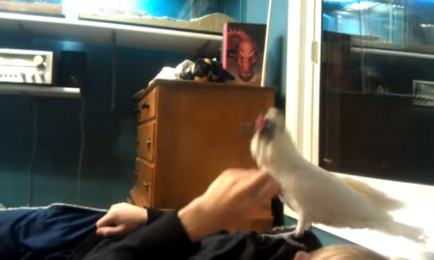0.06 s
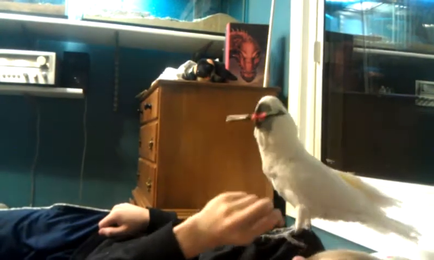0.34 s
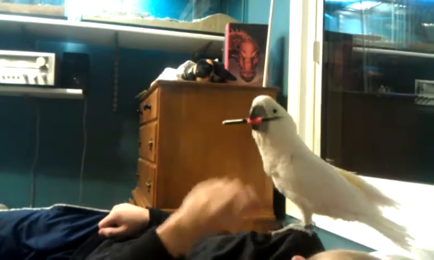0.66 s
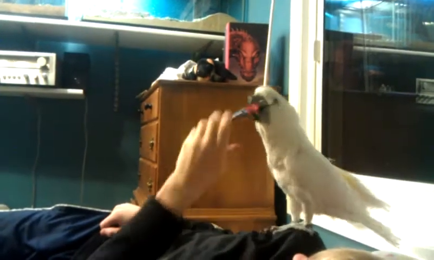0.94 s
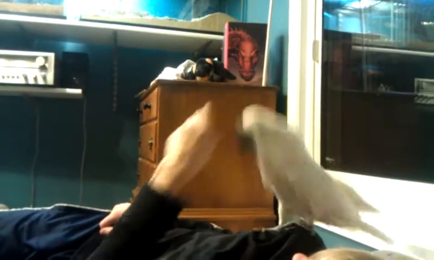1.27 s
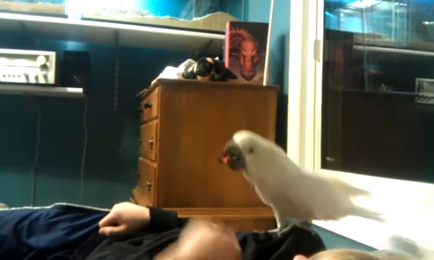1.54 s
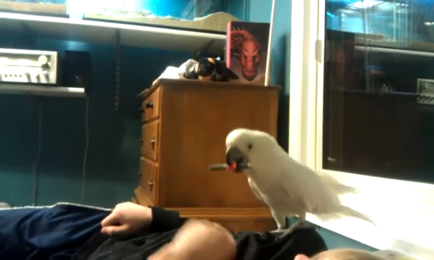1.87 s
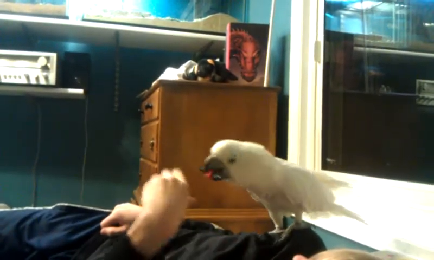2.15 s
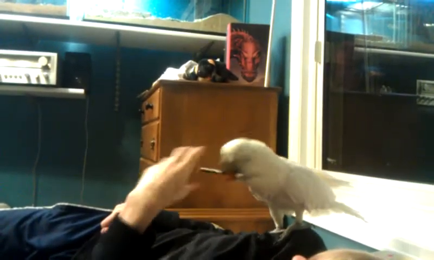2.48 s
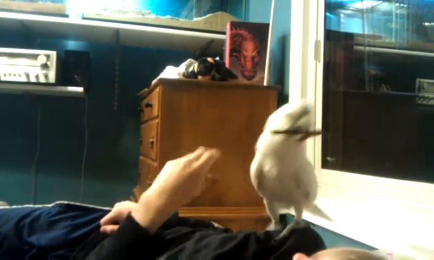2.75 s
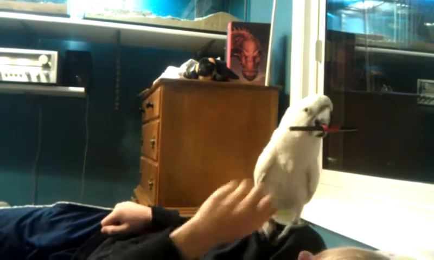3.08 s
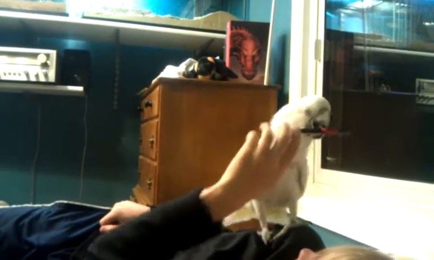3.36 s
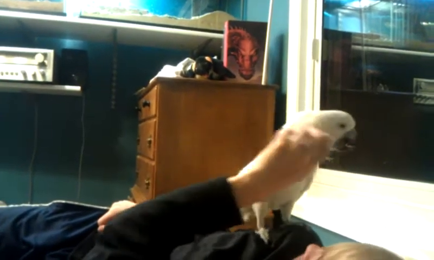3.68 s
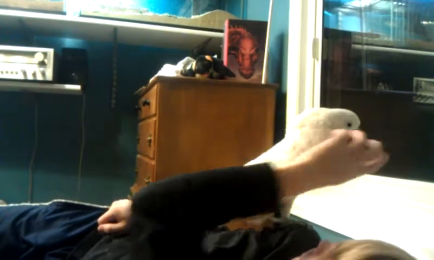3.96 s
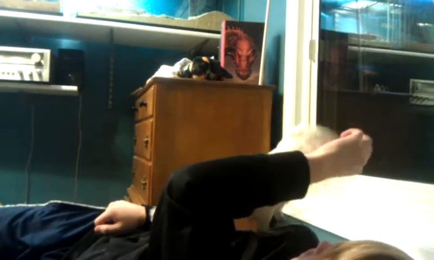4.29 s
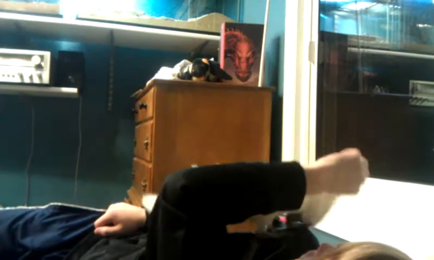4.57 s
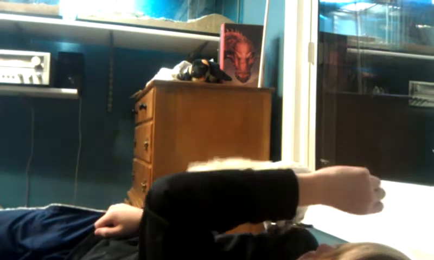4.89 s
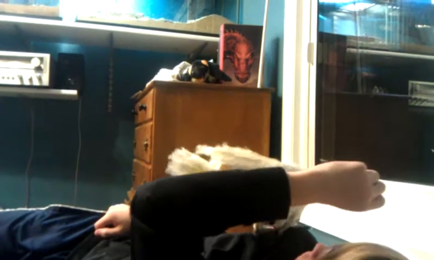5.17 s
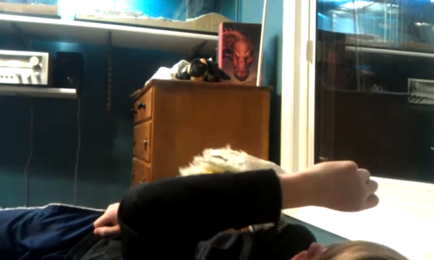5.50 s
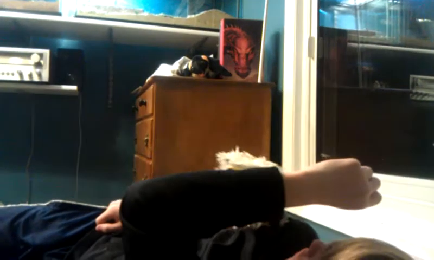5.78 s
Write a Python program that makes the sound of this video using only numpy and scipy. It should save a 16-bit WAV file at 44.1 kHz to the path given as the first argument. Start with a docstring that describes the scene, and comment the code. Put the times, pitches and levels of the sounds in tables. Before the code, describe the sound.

Crisp clicks and cracks come from a pet bird's beak working on a plastic pen, heard from close by in a small room. The loudest snaps fall in the first half, mixed with a few soft handling knocks. Later come fainter scattered clicks and brief rustles of feathers and clothing. A low-level hiss and a very faint electrical hum continue throughout.

```python
"""A steady hiss, a faint mains hum and a brief rustle; then sharp snaps as a cockatoo bites a plastic pen.
Each bite is a burst of slips and cracks that excites the damped resonances of the pen held in the beak.
Feathers and a sleeve rustle by stick-slip friction, claws and beak tick, and feet and hand knock softly.
The small bedroom answers with early reflections and a diffuse tail whose treble dies first."""
import sys
import numpy as np
from scipy import signal
from scipy.fft import rfft, irfft
from scipy.io import wavfile

SR = 44100
rng = np.random.default_rng(int(sys.argv[2]) if len(sys.argv) > 2 else 0)


def file_out(sig):
    """Save sig as 16-bit WAV at sys.argv[1]."""
    # one column per channel
    cols = np.atleast_2d(sig).T
    # limit, then scale
    lim = np.clip(cols, -1, 1)
    pcm = np.round(lim * 32767).astype(np.int16)
    wavfile.write(sys.argv[1], SR, pcm)


N = 265923
TIME = np.arange(N) / SR


def undb(db):
    """Amplitude ratio of a level in decibels."""
    return 10 ** (np.asarray(db) / 20)


def unit(x):
    """Normalisation to unit energy."""
    return x / np.sqrt(np.sum(x ** 2) + 1e-18)


def colour(x, points):
    """Spectral shaping by (f/Hz, level/dB) points, to unit rms."""
    hz, db = np.transpose(points)
    f = np.maximum(np.arange(N // 2 + 1) * SR / N, 1)
    gain = undb(np.interp(np.log(f), np.log(hz), db))
    return unit(irfft(rfft(x) * gain, N)) * np.sqrt(N)


def add(track, at_s, sound):
    """Superposition of a delayed sound on a track."""
    start = int(np.clip(at_s * SR, 0, N - 1))
    track[start:start + len(sound)] += sound[:N - start]


# spectral density of air and microphone noise: f/Hz, relative level/dB
HISS_SPECTRUM = [(25, -17), (60, -17.5), (95, -16), (120, -7.5), (150, -13), (250, -10), (500, -9.5),
                 (1300, -10), (2400, -12), (4000, -14.5), (6000, -13.5), (9000, -16), (16000, -13.5)]
def hiss(rms_db=-59):
    """Stationary broadband noise of the air and the microphone."""
    return undb(rms_db) * colour(rng.standard_normal(N), HISS_SPECTRUM)


# partials of the appliance: harmonic number, rms level/dB
HUM_HARMONICS = [(2, -83.5), (3, -82), (4, -83.5), (5, -74), (6, -83), (7, -92.5), (8, -86.5), (12, -79)]
def hum(mains_hz=60):
    """Forced vibration: an appliance sounds at harmonics of the mains frequency."""
    return sum(undb(db) * np.sqrt(2) * np.sin(2 * np.pi * (k * mains_hz * TIME + rng.random()))
               for k, db in HUM_HARMONICS)


# strokes of beak, feathers and sleeve: t/s, duration/s, level/dB
RUBBING_STROKES = [(0, 0.017, -48.5), (0.903, 0.21, -68), (1.093, .16, -54), (1.384, 0.073, -70),
                   (2.137, .02, -53), (2.703, 0.049, -60.5), (4.449, 0.16, -63.5), (5.116, 0.02, -53.5),
                   (5.357, .03, -55), (5.488, 0.068, -60), (5.795, 0.15, -61), (5.992, .03, -52)]
def rubbing(attack_s=0.0048, release_s=0.042):
    """Amplitude envelope of the friction: each stroke rises exponentially, holds and decays."""
    envelope = np.zeros(N)
    for at_s, duration, db in RUBBING_STROKES:
        early = np.maximum(at_s - TIME, 0)
        late = np.maximum(TIME - at_s - duration, 0)
        envelope = np.maximum(envelope, undb(db) * np.exp(-early / attack_s - late / release_s))
    return envelope


# spectrum of the friction noise: f/Hz, relative level/dB
RUSTLE_SPECTRUM = [(300, -40), (1500, -13.5), (3000, -0.5), (3900, -7.5), (5000, 3), (6400, 2),
                   (8500, -4.5), (10500, -3.5), (16000, -13.5)]
def rustle(catch_db=2.5, grain_db=8.0):
    """Stick-slip friction: dense tiny slips catch and let go every few milliseconds."""
    knots = N // 200
    catches = np.interp(TIME, np.linspace(0, TIME[-1], knots), rng.standard_normal(knots))
    slips = rng.standard_normal(N) * undb(grain_db * rng.standard_normal(N) + catch_db * catches)
    return colour(slips, RUSTLE_SPECTRUM) * rubbing()


def minimum_phase(gain):
    """Minimum phase: the causal response with this gain curve whose energy arrives soonest."""
    cepstrum = irfft(np.log(gain + 1e-9))
    half = len(cepstrum) // 2
    cepstrum[1:half] *= 2
    cepstrum[half + 1:] = 0
    return irfft(np.exp(rfft(cepstrum)))


def resonance(f, centre_hz, width_hz):
    """Lorentzian power response of a damped mode."""
    return 1 / (1 + (2 * (f - centre_hz) / width_hz) ** 2)


# modes of the pen held in the beak: f/Hz, bandwidth/Hz, relative level/dB
PEN_MODES = [(2130, 380, -37), (3206, 600, 0.5), (4720, 1600, -4), (5800, 670, -2), (6390, 640, 1.5),
             (7340, 450, -0.5), (9640, 820, -0.5), (11030, 1000, -1), (12600, 1100, -6),
             (14800, 2000, -2.5)]
def snap(db, body_db, edge_db, spot_hz, spot_db, size=2048):
    """Modal impulse response of the pen to one crack, with the bitten spot ringing above it."""
    f = np.arange(size // 2 + 1) * SR / size
    power = sum(undb(mode_db) ** 2 * resonance(f, hz, width) for hz, width, mode_db in PEN_MODES)
    power *= 1 + (undb(abs(spot_db)) ** 2 - 1) * resonance(f, spot_hz, width_hz=800)
    power *= (f ** 2 + 1) / (f ** 2 + 900 ** 2)  # so small a body radiates little below 900 Hz
    # where and how sharply the beak bears sets the share of body, middle and edge
    bands_hz = [(1500, 4000), (4000, 8500), (8500, 16000)]
    energy = [2 * power[(f > low) & (f < high)].sum() / size for low, high in bands_hz]
    body, middle, edge = db + np.array([body_db, 0, edge_db]) - 10 * np.log10(energy)
    shelves_db = np.interp(f, [3500, 4500, 7800, 11000], [body, middle, middle, edge])
    shelves_db += min(edge_db, 0) * np.clip((f - 11000) / 7000, 0, 1)  # blunt contact dulls the top
    return minimum_phase(np.sqrt(power * SR / 1000) * undb(shelves_db))


def bending(x, travel_s=0.00035):
    """Dispersion: bending waves in the barrel speed up as the root of frequency, so treble leads."""
    f = np.arange(len(x) // 2 + 1) * SR / len(x)
    lag_cycles = travel_s * (2 * np.sqrt(f * SR / 2) - f)
    return irfft(rfft(x) * np.exp(-2j * np.pi * lag_cycles))


def crumbling(decay_ms, grain_db=3, size=2048):
    """Force of a fracture: a first impulse and a decaying train of tiny cracks, of unit energy."""
    t_ms = np.arange(size) * 1000 / SR
    cracks = rng.standard_normal(size) * undb(grain_db * rng.standard_normal(size))
    force = unit(cracks * np.exp(-t_ms / decay_ms))
    force[0] = 0.75 / (1 + decay_ms / 2)
    return unit(force)


# snaps of beak and claws on the pen: t/s, level/dB at 4-8.5 kHz, relative body level/dB below that,
# relative edge level/dB above it, spot f/Hz, spot prominence/dB (sign ignored), crumbling time/ms
PEN_BITES = [(.0662, -13, -17, -6, 4500, 4, 0.6), (.2794, -33.5, -22.5, -7, 6900, 6, 0.67),
             (.5195, -19.5, -32, 6, 8660, 25, 0.28), (.6055, -39, -9.5, 0.5, 8650, 10, 0.78),
             (.7212, -43.5, -7.5, -5, 4100, 9, 1.5), (.8282, -19, -14, -5, 5700, 8.5, 0.86),
             (1.0736, -26.5, -11, -9.5, 7000, 3, 2.24), (1.106, -30.5, -28, -3, 7000, 5, 1),
             (1.1323, -19.5, -17.5, -1, 5800, 7, 1.8), (1.1736, -12, -22, -2, 5130, 14.5, 1.2),
             (1.1785, -16.5, -40, 0.5, 5200, -3, 10), (1.2743, -29, -17.5, -5.5, 7100, 5, 1),
             (1.3045, -34, -35, -0.5, 6600, -3, 3.1), (1.3767, -29.5, -13, -0.5, 5500, 2, 7),
             (2.1441, -23.5, -19, -4.5, 6600, 8, .9), (2.3232, -36.5, -10, -2.5, 5100, 12, 3.3),
             (2.4473, -13.5, -20.5, -4, 5500, -5, 0.85), (2.4483, -16, -14, -16, 7800, 12, .65),
             (2.6168, -45, 4, -14, 3980, 21, 0.59), (2.8023, -44.5, -21, 1.5, 6460, 15, .6),
             (2.8857, -28, -11, -0.5, 6760, 5.5, 0.72), (3.2575, -26.5, -10, -9, 4700, 4, 1.07),
             (3.3991, -32.5, -11.5, -11.5, 5000, 5, 0.44), (3.5338, -41, -17.5, -12, 5940, 7, 0.43),
             (4.433, -44.5, -10, -13, 6300, 9, 1.04), (4.4666, -47, -20, -16, 6240, 5, .5),
             (4.5255, -36.5, -9, -12, 5400, 13, 0.48), (5.1093, -35, -22, -11, 5630, 1, 2.1),
             (5.9982, -40, -3, -10, 6750, 11, 1.5)]
def bites(slip_lead_s=0.0014, slip_db=-13.5, direct_db=-1, paths=4):
    """Impulsive excitation: the beak slips, then the plastic gives. Returns direct and room feeds."""
    direct, spread = np.zeros(N), np.zeros((paths, N))
    for i, (at_s, *tone, crumble_ms) in enumerate(PEN_BITES):
        ring = bending(snap(*tone))
        slip = undb(slip_db) * signal.fftconvolve(ring, crumbling(crumble_ms))
        crack = signal.fftconvolve(ring, crumbling(crumble_ms))
        add(direct, at_s - slip_lead_s, slip)
        add(direct, at_s, crack)
        # each crack radiates its own way, and in the room its splinters blend into one even snap
        add(spread[i % paths], at_s + crumble_ms / 2000, ring)
    return undb(direct_db) * direct, spread


# blows of feet, hand and pen: t/s, f/Hz, peak level/dB, T60/s, relative bandwidth
SOFT_BLOWS = [(.066, 596, -53.5, 0.01, 0.31), (.835, 525, -57, 0.051, 0.17),
              (1.1741, 1840, -25.5, 0.04, 0.54), (1.1764, 526, -43, 0.027, 0.75),
              (2.141, 1140, -48, 0.011, 0.34), (2.324, 1530, -52, 0.11, 0.045),
              (2.642, 865, -53, 0.031, 0.17), (5.155, 1570, -42, 0.11, 0.18), (5.217, 447, -51, 0.032, .6)]
def knocks():
    """Padded impacts: close, heavily damped modes merge into a decaying band of noise."""
    out, t = np.zeros(N), np.arange(SR // 8) / SR
    for at_s, hz, db, t60, width in SOFT_BLOWS:
        shudder = rng.standard_normal(len(t)) * np.exp(-np.log(1000) * t / t60)
        ratio = 1 + max(width, 0.05)
        bandpass = signal.butter(2, [hz / ratio, hz * ratio], "band", fs=SR, output="sos")
        knock = signal.sosfilt(bandpass, shudder)
        add(out, at_s, undb(db) * knock / np.abs(knock).max())
    return out


def ticks(per_s=17, above_stroke_db=9.5, scatter_db=0.5):
    """A Poisson process: claws and beak catch on the pen at random, as hard as the rubbing is then."""
    catches = (rng.random(N) < per_s / SR) * undb(above_stroke_db - scatter_db * rng.standard_normal(N))
    ring = bending(snap(0, body_db=-8.5, edge_db=-4, spot_hz=6100, spot_db=5))
    tick = signal.fftconvolve(ring, crumbling(decay_ms=1.2))
    return signal.fftconvolve(catches * rubbing(), tick)[:N]


# first bounces off window, chest and bed: delay/ms, amplitude ratio
EARLY_ECHOES = [(1.9, 0.17), (4.4, 0.31), (6.1, 0.1), (9.0, 0.033)]
def reflections(x):
    """Specular reflection: nearby surfaces add delayed, weaker copies to the direct sound."""
    out = x.copy()
    for delay_ms, gain in EARLY_ECHOES:
        add(out, delay_ms / 1000, gain * x)
    return out


# bands of the bedroom's tail: f/Hz, level/dB, T60/s
ROOM_BANDS = [(400, -24, 1), (1210, -9.5, 1), (2700, -0.5, 0.33), (5300, -4.5, 0.25), (9000, -3.5, 0.26),
              (14000, -1.5, 0.19)]
def reverberation(x, build_s=0.00033):
    """Diffuse field: dense random echoes decay exponentially, the treble sooner than the bass."""
    t = np.arange(SR // 2) / SR
    echoes = rng.standard_normal(len(t))
    spectrum = rfft(echoes / echoes.std())
    log_f = np.log(np.maximum(np.arange(len(spectrum)) * SR / len(t), 1))
    log_centres = np.log([row[0] for row in ROOM_BANDS])
    response = np.zeros(len(t))
    for (_, db, t60), weights in zip(ROOM_BANDS, np.eye(len(ROOM_BANDS))):
        band = irfft(spectrum * np.interp(log_f, log_centres, weights), len(t))
        fade = unit((1 - np.exp(-t / build_s)) * np.exp(-np.log(1000) * t / t60))
        response += undb(db) * fade * band
    return signal.fftconvolve(x, response)[:N]


def scene():
    """Superposition of the bird, its keeper, the room's answer and the steady background."""
    direct, spread = bites()
    handling = knocks() + rustle() + ticks()
    # every path into the room meets its own pattern of echoes
    tail = sum(reverberation(path) for path in [*spread, handling])
    return (reflections(direct + handling) + tail + hum() + hiss())[None]


def record(dry, cutoff_hz=16000):
    """Band limiting: a steep elliptic low-pass removes the highest treble."""
    return signal.sosfilt(signal.ellip(10, 0.2, 70, cutoff_hz, fs=SR, output="sos"), dry)


dry = scene()
out = record(dry)
file_out(out)
```